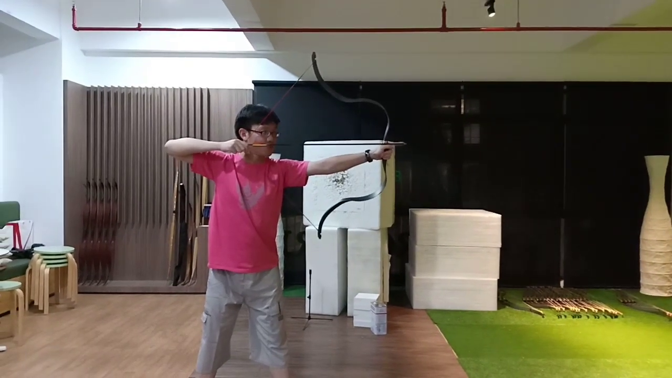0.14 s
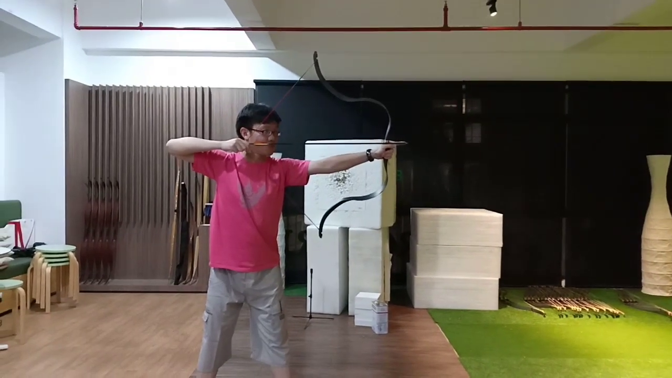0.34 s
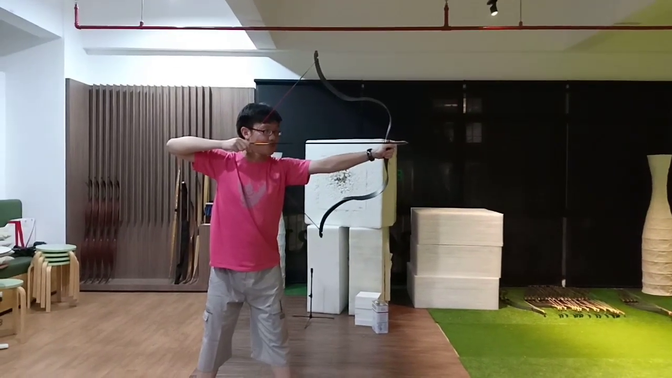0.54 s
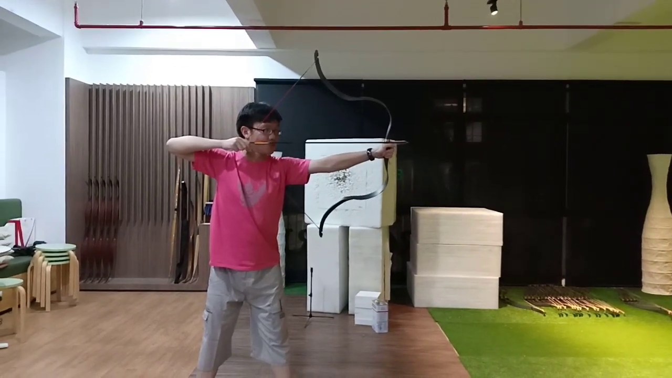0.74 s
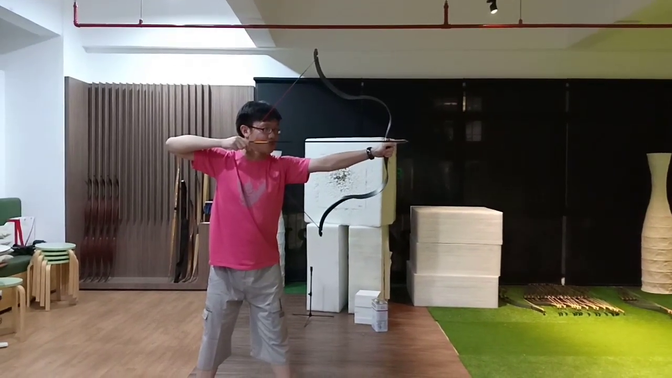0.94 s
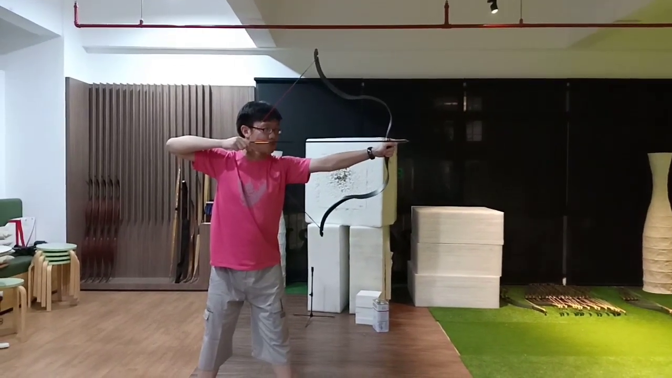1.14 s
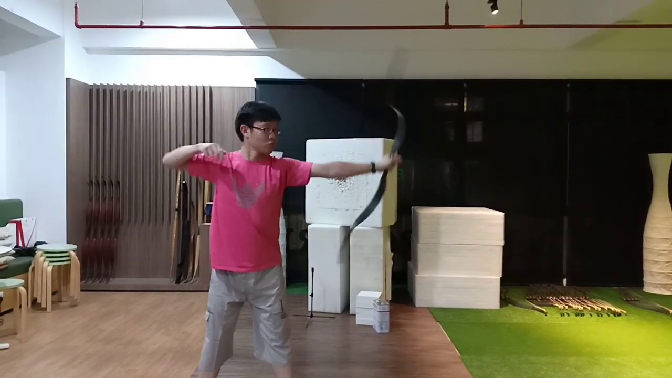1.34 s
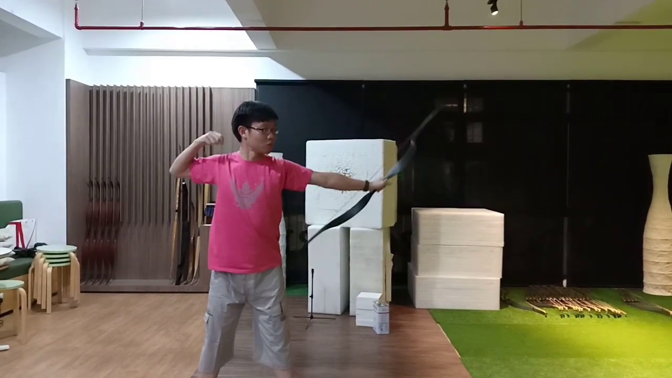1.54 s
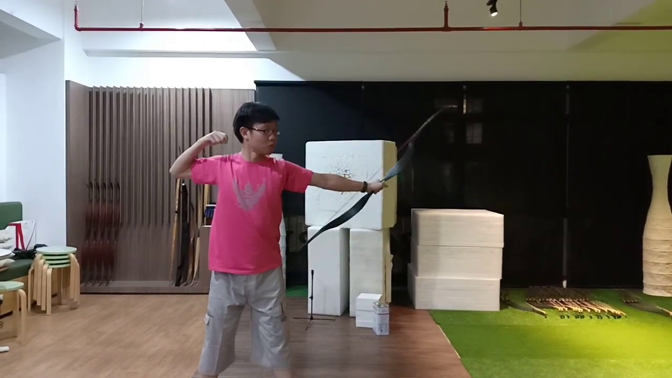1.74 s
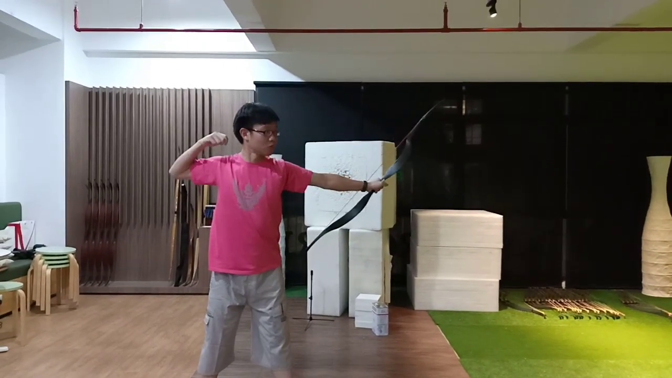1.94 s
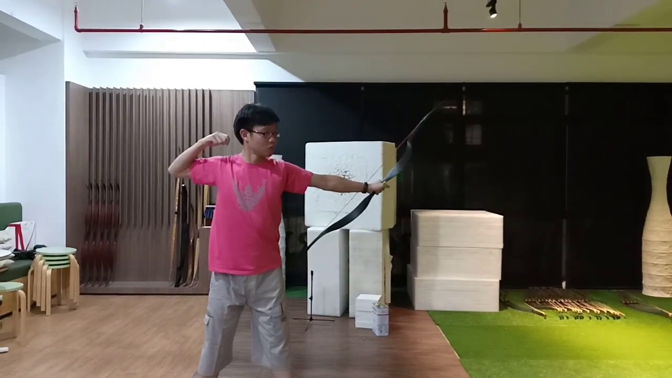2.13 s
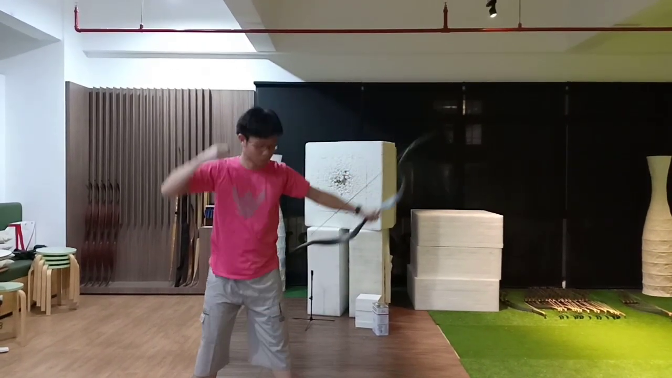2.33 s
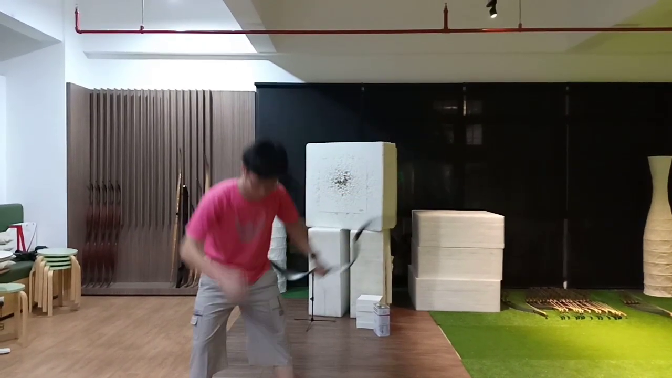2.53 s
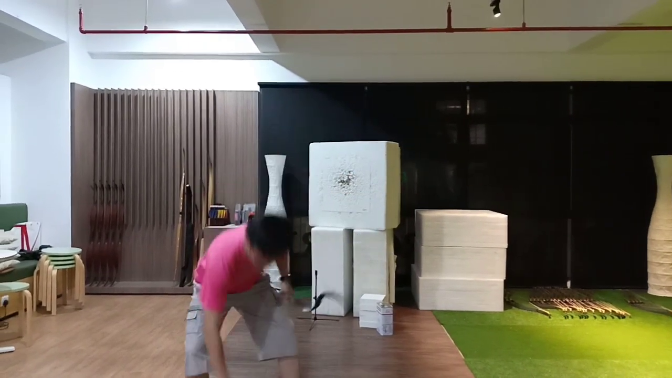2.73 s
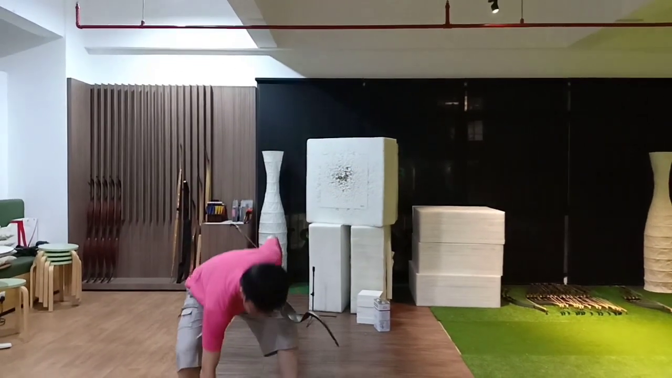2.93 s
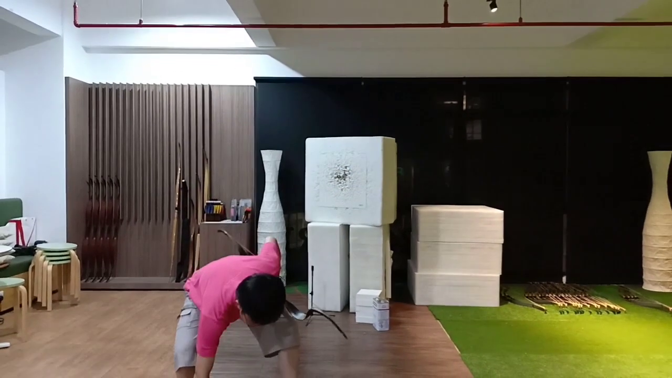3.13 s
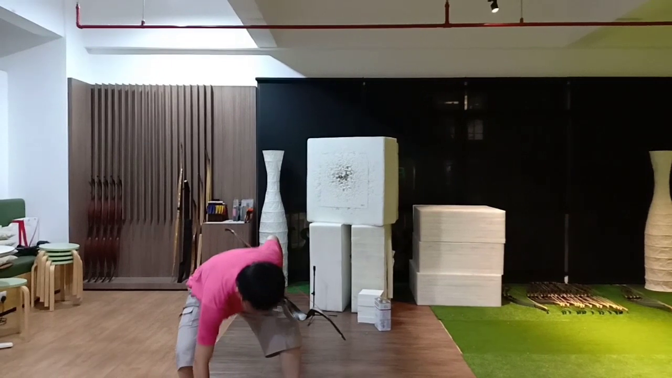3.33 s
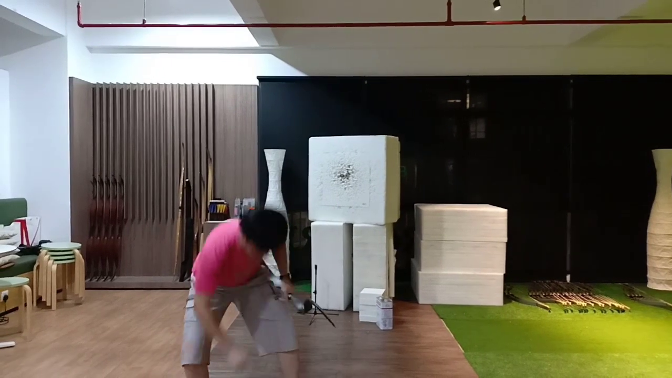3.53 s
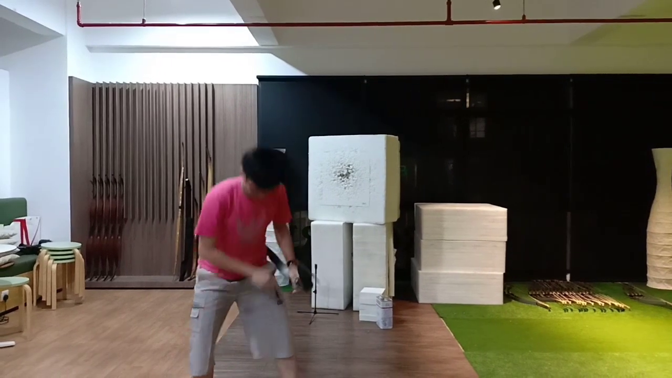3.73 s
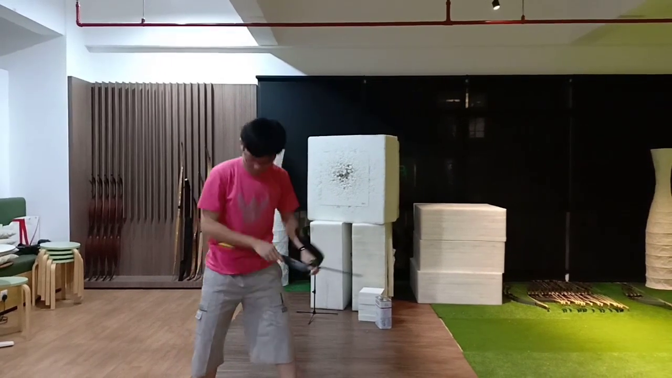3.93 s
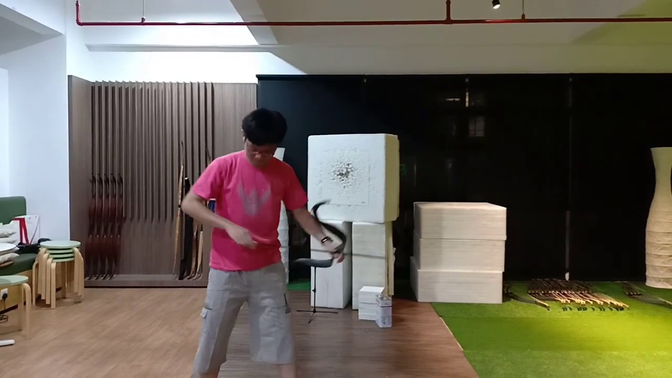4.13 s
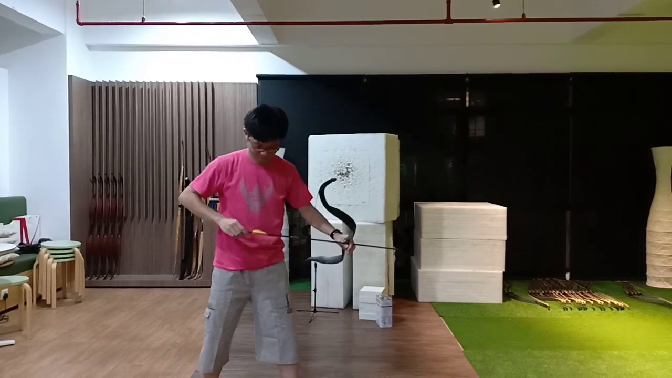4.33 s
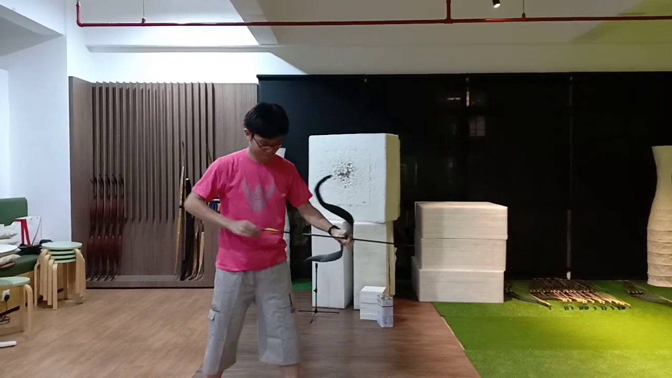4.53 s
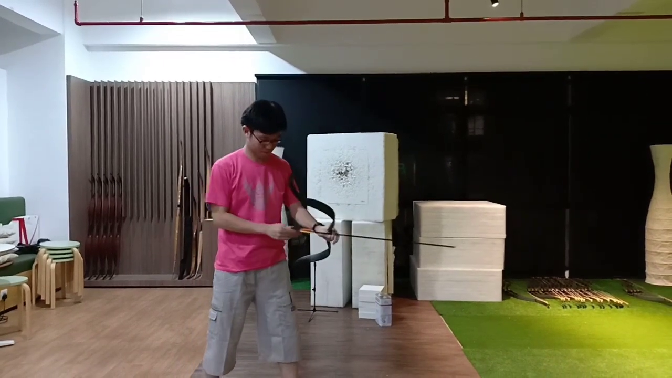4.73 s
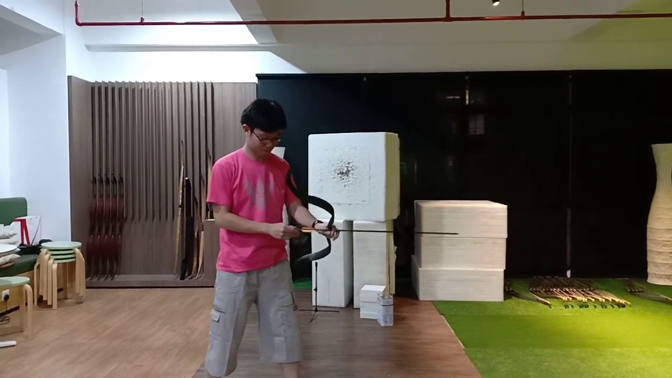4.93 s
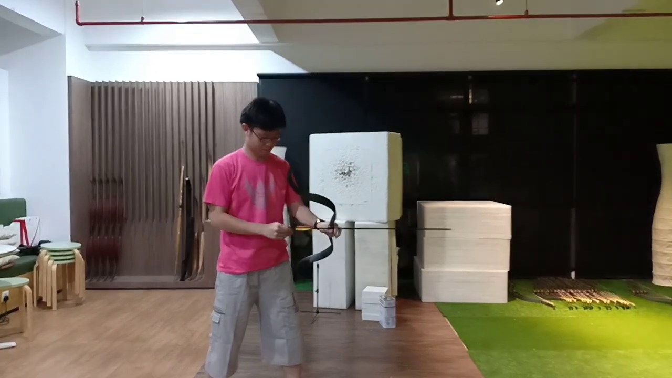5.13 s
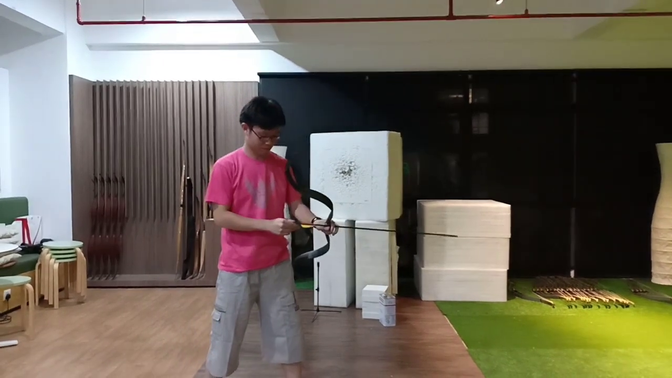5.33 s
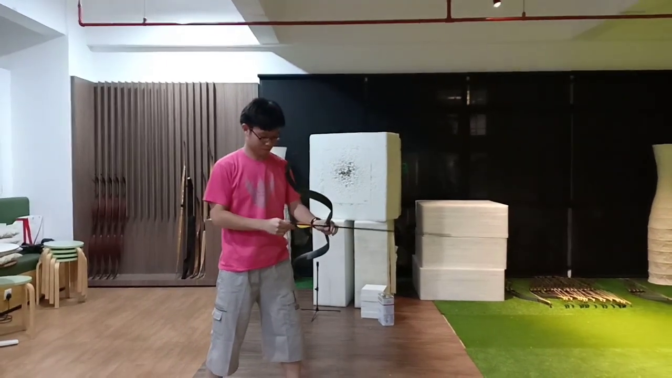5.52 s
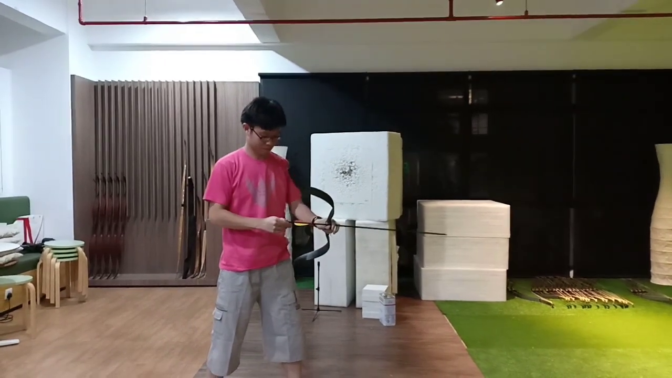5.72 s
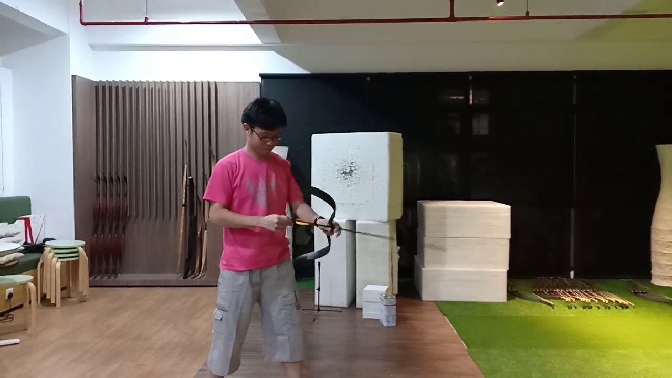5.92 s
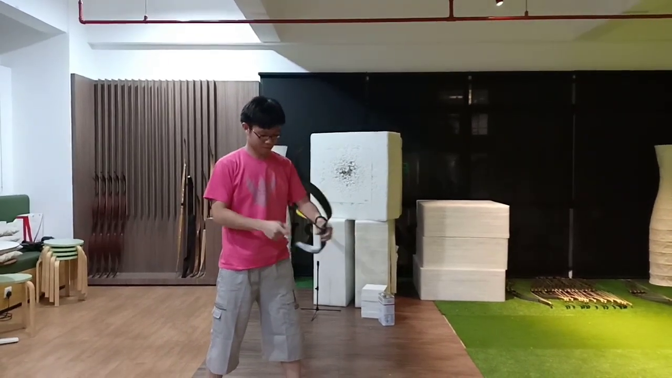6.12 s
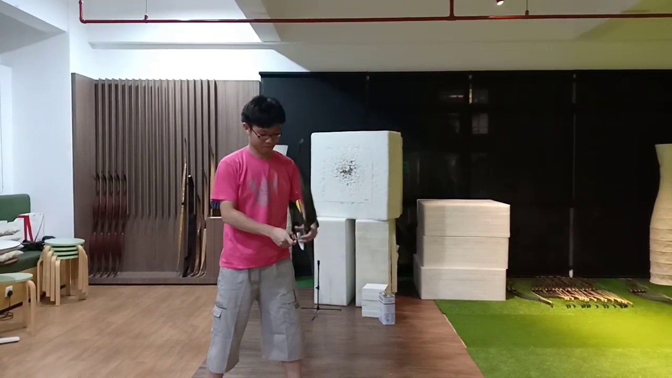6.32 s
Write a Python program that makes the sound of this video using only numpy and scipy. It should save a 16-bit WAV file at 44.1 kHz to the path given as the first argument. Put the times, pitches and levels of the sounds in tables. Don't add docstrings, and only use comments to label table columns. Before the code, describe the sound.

Over a low ventilation rush and fan drone in a reverberant hall, a bowstring slaps hard against its limbs, and a fraction of a second later the arrow cracks and booms into foam to the right. The echo fades for over a second. Then faint hollow shaft clinks, a brighter knock against the bow, soft taps, slight cloth rustle and crisp nock clicks, picked up in stereo by a phone a few metres away.

```python
import sys
import numpy as np
from scipy import signal
from scipy.fft import rfft, irfft, next_fast_len
from scipy.io import wavfile
from scipy.ndimage import uniform_filter1d

SR = 44100
rng = np.random.default_rng(int(sys.argv[2]) if len(sys.argv) > 2 else 0)


def rack_gain(trim_db):
    fader = np.asarray(trim_db, float)
    return 10 ** (fader / 20)


def store_pcm(level_fs):
    pcm = np.round(np.clip(level_fs, -1, 1) * 32767).astype(np.int16)
    wavfile.write(sys.argv[1], SR, np.atleast_2d(pcm).T)


N = 285150
TIME = np.arange(N) / SR
PORT_LAG = 10

# time in seconds, peak in dB, left minus right in dB, echo in dB.
CRACK = [
    (1.508, -6.5, -15, -0.5),
]
# frequency in Hz, level in dB per Hz.
SHAFT_COLOUR = [(300, -28), (450, -17), (900, -37), (1400, -14), (1900, -17.5), (2600, -1.5), (3300, -16.5),
                (4000, -10.5), (4600, -13), (5400, -11.5), (6300, -19), (7000, -27.5), (12000, -35),
                (16000, -39)]


def bow_string(room):
    # time in seconds, peak in dB, left minus right in dB, echo in dB, ring in dB.
    slaps = [
        (1.3141, -27, -2, -4, -8),
        (1.316, -18, -8.5, -3, -10),
        (1.326, -22, 0, 1.5, 1),
        (1.3329, -14.5, 9, -1.5, -7),
        (1.3364, -8, -7, -6, -3),
        (1.3605, -5.5, -0.5, -7.5, 3),
    ]
    # frequency in Hz, level in dB per Hz.
    string_colour = [(40, -38), (70, -28), (136, -11.5), (217, -29), (280, -12), (430, -18.5), (620, -11),
                     (1400, -17.5), (2300, -3), (3200, -11.5), (4000, -6.5), (5900, -11.5), (7750, -27.5),
                     (16000, -31.5)]
    # frequency in Hz, level in dB, T60 in seconds.
    limb_modes = [(278.6, -4.5, 0.18), (429, -8, 0.24), (2150, -9, 0.033), (3850, -0.5, 0.11),
                  (5060, -8, .08), (5900, -11, .06)]
    return hits(room, slaps, 0.0028, string_colour, 9.03, 0.0028, limb_modes, -34.5)


def point_crack(room):
    # frequency in Hz, level in dB per Hz.
    crack_colour = [(180, -29.5), (300, -1), (528, -26), (713, 3.5), (1030, -12), (1610, -30),
                    (1690, -13.5), (2610, -3), (3400, -20.5), (5160, -12.5), (8220, -31), (11100, -32.5),
                    (16000, -38)]
    # frequency in Hz, level in dB, T60 in seconds.
    point_modes = [(2470, -1, 0.027), (2810, -1.5, 0.028)]
    return rack_gain(9.5) * hits(room, CRACK, 0.0039, crack_colour, 6.64, 0.013, point_modes, -30.5)


def foam_boom(room):
    # time in seconds, peak in dB, left minus right in dB, echo in dB.
    booms = [
        (1.5099, -9.5, 4, 3),
        (1.541, -11.5, -5, -4),
        (1.5628, -2, 0, -7),
        (1.617, -15.5, -7, -4),
    ]
    # frequency in Hz, level in dB per Hz.
    boom_colour = [(24, -61), (40, -39), (125, -12.5), (148, -6), (235, -13), (308, 1.5), (381, -3.5),
                   (499, -1.5), (539, -9), (720, 0), (1060, 1.5), (1310, -9.5), (2470, -13.5), (3430, -20),
                   (4000, -19), (5200, -74), (8800, -120)]
    return rack_gain(7) * hits(room, booms, 0.0086, boom_colour, 9.48, 0.0093)


def stand_clink(room):
    # time in seconds, peak in dB, left minus right in dB, echo in dB, ring in dB.
    knocks = [
        (3.028, -46, -7, 5, -6),
        (3.0466, -27.5, -10.5, 1, 2),
        (3.065, -40, 2, 2, -12),
    ]
    brushes = [
        (3.3132, -38, -9, -5, -0.5),
        (3.3442, -41.5, -9, -3, 0.5),
    ]
    # frequency in Hz, level in dB, T60 in seconds.
    stand_modes = [(2191, -6, .1), (2536, 1, .16), (3618, -3, .1), (4145, -8, .3), (4753, 2, .14),
                   (5410, -7, .12), (6115, -10, .08)]
    brush_modes = [(4143, 1, .4), (4748, 2, .22), (4840, -3, .25), (8613, -24, .2)]
    rattle_s = 0.0026
    return (hits(room, knocks, rattle_s, SHAFT_COLOUR, 6.6, 0.0097, stand_modes, -35.5)
            + hits(room, brushes, rattle_s, SHAFT_COLOUR, 8.2, 0.0042, brush_modes, -31.5))


def bow_knock(room):
    # time in seconds, peak in dB, left minus right in dB, echo in dB, ring in dB.
    strikes = [
        (3.8888, -18.5, -10.5, 0, 6.5),
        (3.9003, -24, -2, 0.5, -0.5),
    ]
    # frequency in Hz, level in dB, T60 in seconds.
    knock_modes = [(1370, -6, .08), (2579, -3, .22), (2624, 1, .3), (3655, -6, .08), (4086, -5, .2),
                   (5380, 12, .012), (5230, -6, .03), (5722, -6, .05), (9180, -16, .04), (10410, -26, .15)]
    return hits(room, strikes, 0.005, SHAFT_COLOUR, 6.1, 0.0018, knock_modes, -36)


def grip_taps(room):
    # time in seconds, peak in dB, left minus right in dB, echo in dB, ring in dB.
    taps = [
        (4.7137, -42, -7, -1, -13),
        (4.826, -42, -10, -4, -12),
        (4.885, -32, -8, -4.5, -1.5),
        (4.895, -43, -8, -11, 1),
        (4.9145, -42, -1, -8, 0),
        (5.1004, -37, -12, -11, -15),
        (5.129, -46, -13, -10, -4),
    ]
    # frequency in Hz, level in dB per Hz.
    tap_colour = [(880, -39), (1500, -16), (2210, -10), (2510, -3), (3380, -8.5), (4870, -9), (5330, -6),
                  (7920, -28.5), (9370, -28), (16000, -36)]
    # frequency in Hz, level in dB, T60 in seconds.
    tap_modes = [(2000, -6, .06), (2525, 2, .07), (3063, -7, .08), (5330, 6, .016), (9170, -20, .04)]
    return hits(room, taps, 0.0016, tap_colour, 10.4, 0.0087, tap_modes, -24.5)


def nock_click(room):
    # time in seconds, peak in dB, left minus right in dB, echo in dB.
    snaps = [
        (5.441, -26, -5, -4.5),
        (5.454, -29.5, 1, -5),
        (5.6321, -42.5, -9, -5),
    ]
    seatings = [
        (5.805, -25.5, -6.5, -5.5, 2),
        (5.8200, -27.5, -8, -12, -10),
    ]
    # frequency in Hz, level in dB per Hz.
    snap_colour = [(700, -20), (1100, -12), (1600, -6), (2300, 1.5), (3330, -5.5), (5000, -0.5), (6300, -5),
                   (7470, -20), (13700, -25.5), (16000, -28)]
    seat_colour = [(760, -51), (1300, -15), (1980, -7.5), (2150, -7), (2420, 1), (3010, -6), (3790, -3),
                   (5310, -1), (7050, -15), (13800, -25), (16000, -21)]
    # frequency in Hz, level in dB, T60 in seconds.
    nock_modes = [(2400, 0, .08), (3850, 0, .06)]
    return (hits(room, snaps, 0.0017, snap_colour, 7.2, 0.0038)
            + hits(room, seatings, 0.0015, seat_colour, 6.7, 0.0039, nock_modes, -32.5))


def hits(room, events, rattle_s, colour, wet_db, rise_s, modes=(), ring_db=-30):
    out = np.zeros((2, 2 * N))
    t = np.arange(2048) / SR
    body = np.pad(causal(colour), (0, SR // 2 - 1024))
    rung = rack_gain(ring_db) * ring(modes)
    for start_s, db, pan_db, echo_db, *ring_column in events:
        mode_gain = rack_gain(sum(ring_column))
        spikes = rng.standard_normal(2048) * rack_gain(3.8 * rng.standard_normal(2048))
        burst = spikes * np.exp(-t / rattle_s)
        near = signal.fftconvolve(burst / 3, body)[:len(body)] + 4 * mode_gain * rung
        radiated = 4 * body + 2.57 * mode_gain * rung
        far = signal.fftconvolve(radiated[None], echo(room, rise_s), axes=1)
        k = int(start_s * SR)
        left = k + PORT_LAG // 2
        out[:, k:k + far.shape[1]] += rack_gain(db + echo_db + wet_db) * far
        out[0, left:left + len(near)] += rack_gain(db + pan_db / 2) * near
        out[1, k:k + len(near)] += rack_gain(db - pan_db / 2) * near
    return out[:, :N]


def ring(modes):
    t = np.arange(SR // 2) / SR
    out = np.zeros(len(t))
    for hz, db, t60 in modes:
        detune, phase = rng.standard_normal(2)
        twin = 0.36 * np.sin(2 * np.pi * hz * (1 + 0.011 * detune) * t + phase)
        decay = rack_gain(db - 60 * t / np.clip(t60, .008, .9))
        out += decay * (np.sin(2 * np.pi * hz * t) + twin)
    return out * (1 - np.exp(-t / 0.00071))


def causal(colour, size=2048):
    cepstrum = irfft(np.log(rack_gain(on_log(colour, np.fft.rfftfreq(size, 1 / SR)))))
    cepstrum[1:size // 2] *= 2
    cepstrum[size // 2 + 1:] = 0
    response = irfft(np.exp(rfft(cepstrum)))[:size // 2]
    return response / np.sqrt(np.sum(response ** 2))


def on_log(table, hz):
    f, v = np.transpose(table)
    return np.interp(np.log(np.maximum(hz, 1)), np.log(f), v)


def hall():
    # frequency in Hz, T60 in seconds.
    hall_t60 = [(80, 1.52), (250, 1.25), (700, 1.294), (1500, 1.12), (3000, 0.83), (6000, 0.74),
                (12000, 0.92)]
    size = 2 ** 16
    t = np.arange(size) / SR
    hz, noise = ports(size)
    centres = 40 * 2 ** np.arange(0, 9.5, .5)[:, None]
    octaves_off = np.log2(np.maximum(hz, 1) / centres)
    bands = np.cos(np.pi * np.clip(octaves_off, -.5, .5)) ** 2
    return irfft(noise[:, None] * bands), rack_gain(-60 * t / on_log(hall_t60, centres))


def echo(room, rise_s):
    bands, fade = room
    t = np.arange(fade.shape[1]) / SR
    stretch = np.roll(bands, rng.integers(len(t)), axis=2)
    tail = np.einsum("cbt,bt->ct", stretch, fade)
    # left 2 dB, right 6 dB
    early_db = np.array([[2], [6]]) * np.exp(-t / 0.052)
    spikes = np.repeat(rng.standard_normal(len(t) // 64), 64) * np.exp(-t / 0.051)
    grain_db = 4.5 * uniform_filter1d(spikes, size=32)
    tail *= (1 - np.exp(-t / rise_s)) * rack_gain(early_db + grain_db)
    return tail / np.sqrt(np.sum(tail ** 2) / 2)


def ports(size):
    # frequency in Hz, left-right likeness from 0 to 1.
    likeness = [(30, 0.5), (70, 1), (130, 0.99), (250, 1), (500, 0.82), (1000, 0.12), (16000, .0)]
    hz = np.fft.rfftfreq(size, 1 / SR)
    like = np.clip(on_log(likeness, hz), 0, 1)
    mid, side = rfft(rng.standard_normal((2, size)))
    shared = np.sqrt(1 + like) * mid
    apart = np.sqrt(1 - like) * side
    return hz, np.array([shared + apart, shared - apart]) / np.sqrt(2)


def rustle():
    # loudest from in seconds, hold in seconds, level in dB, swell in dB per second.
    moves = [
        (2.766, 0.21, -68.5, 60),
        (3.533, 0.23, -74.5, 300),
        (4.252, .01, -58, 102),
        (4.754, .01, -58, 500),
        (5.61, .005, -68, 300),
    ]
    level = sum(rack_gain(swell(*row, 95)) for row in moves)
    flutter = rack_gain(2 * walk(27))
    hiss = hump(5000, 1330) + rack_gain(-15) * hump(14000, 5000)
    return uniform_filter1d(level, 900) * flutter * hiss


def ventilation():
    # frequency in Hz, level in dB per Hz.
    air_colour = [(14, -28), (22, -36), (40, -16.5), (70, -10), (150, -3.5), (420, -9.5), (870, -12.5),
                  (1530, -21.5), (2750, -17.5), (3340, -30), (6000, -36.5), (7500, -45), (13000, -48.5),
                  (16000, -51)]
    # frequency in Hz, width in Hz, level in dB.
    fans = [(103.6, 23, -62), (146.5, 14.4, -62), (197.3, 11, -62.5), (249, 23, -66.5), (327.3, 20, -70),
            (402, 2, -66), (520, 25, -67.5), (2150, 200, -72.5), (2900, 140, -81)]
    # loudest from in seconds, hold in seconds, pitch in Hz, level in dB, fade in dB per second.
    motor = [
        (0, .3, 166, -51, 130),
        (4.0, .6, 103.2, -54, 58),
        (6.4, .1, 104, -65, 60),
    ]
    hz, noise = ports(next_fast_len(N, True))
    air = unit(irfft(noise * rack_gain(on_log(air_colour, hz)))[:, :N])
    out = rack_gain(-51.5 + 0.5 * walk(1.85)) * air
    for f, width, db in fans:
        out += rack_gain(db + 2.7 * walk(2.99)) * hump(f, width / 2)
    turn = 2 * np.pi * np.cumsum(1 + 0.02523 * walk(14)) / SR
    motor_sway = rack_gain(1.8 * walk(7.5))
    for start_s, hold_s, f, db, fade in motor:
        out += motor_sway * rack_gain(swell(start_s, hold_s, db, 31, fade)) * np.sin(f * turn)
    return np.array([rack_gain(-1.22) * np.roll(out[0], PORT_LAG), out[1]])


def hump(centre_hz, width_hz):
    hz, noise = ports(next_fast_len(N, True))
    return unit(irfft(noise / (1 + ((hz - centre_hz) / width_hz) ** 2))[:, :N])


def unit(x):
    return x / np.sqrt(np.mean(x ** 2))


def walk(rate):
    k = int(SR / rate)
    steps = np.repeat(rng.standard_normal(N // k + 1), k)
    return uniform_filter1d(uniform_filter1d(steps, k), k)[:N]


def swell(start_s, hold_s, db, rise_db_s, fall_db_s):
    before_s = np.maximum(start_s - TIME, 0)
    after_s = np.maximum(TIME - start_s - hold_s, 0)
    return db - rise_db_s * before_s - fall_db_s * after_s


def scene():
    room = hall()
    shot = bow_string(room) + point_crack(room) + foam_boom(room)
    loading = stand_clink(room) + bow_knock(room) + grip_taps(room) + nock_click(room)
    return shot + loading + rustle() + ventilation()


def low_pass(x):
    return signal.sosfilt(signal.butter(12, 16800, fs=SR, output="sos"), x)


def record(dry):
    rest_db, duck_db, ahead_s, hold_s = -0.51, 6.5, 0.021, 0.29
    grab_db_s, free_db_s = 400, 14.5
    grip_db = swell(CRACK[0][0] - ahead_s, hold_s, duck_db, grab_db_s, free_db_s)
    ducked = dry * rack_gain(rest_db - np.maximum(grip_db, 0))
    top_edge = signal.cheby2(12, 30, 16300, fs=SR, output="sos")
    return low_pass(signal.sosfilt(top_edge, ducked) + .001)


dry = scene()
out = record(dry)
store_pcm(out)
```